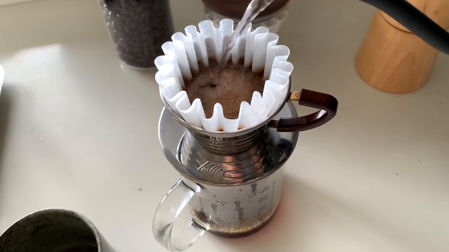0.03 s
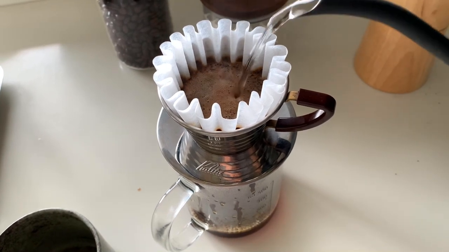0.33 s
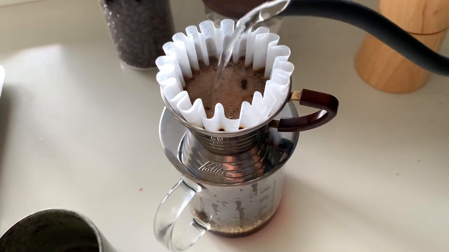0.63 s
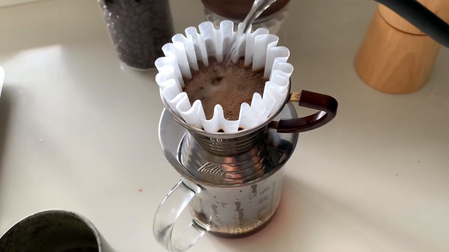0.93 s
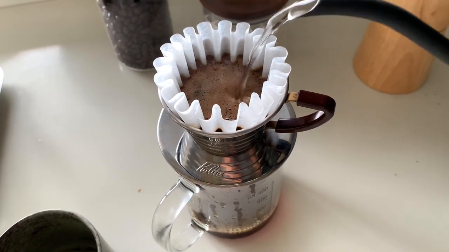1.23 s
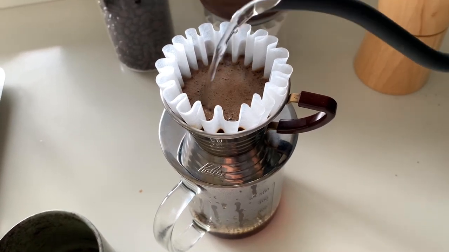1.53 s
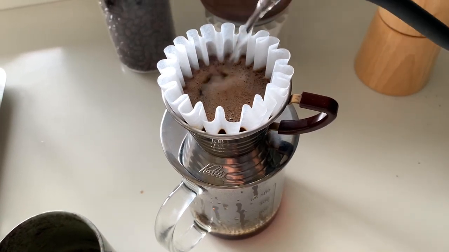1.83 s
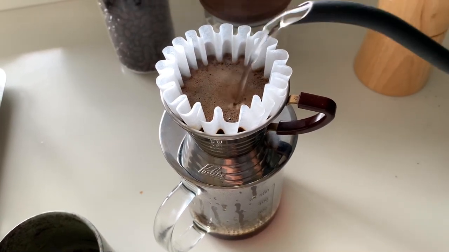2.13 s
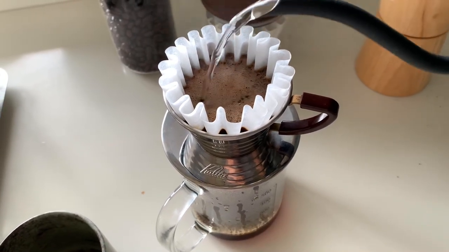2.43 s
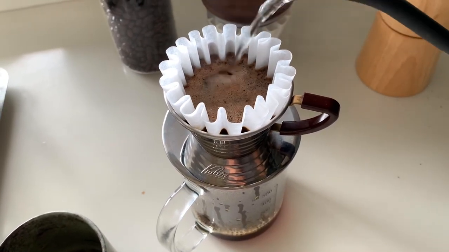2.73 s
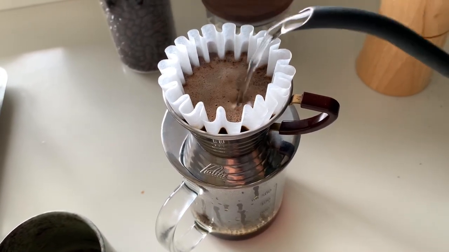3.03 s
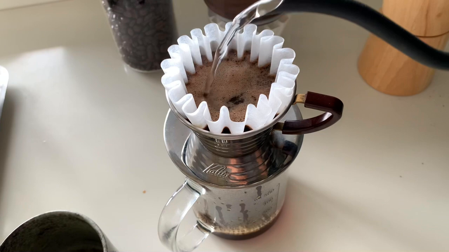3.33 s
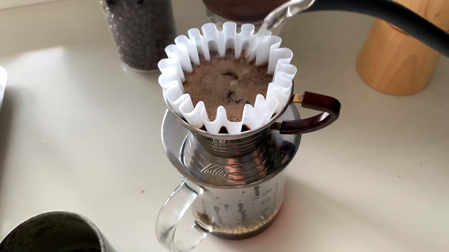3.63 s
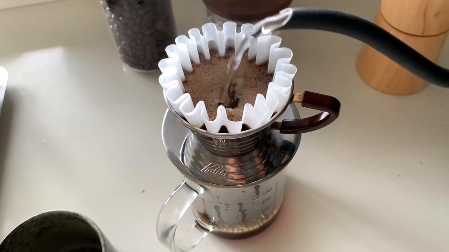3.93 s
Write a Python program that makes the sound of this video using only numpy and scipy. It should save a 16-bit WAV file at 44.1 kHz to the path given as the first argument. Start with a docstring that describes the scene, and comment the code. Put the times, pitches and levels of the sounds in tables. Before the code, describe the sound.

Close by in a quiet room, coffee drips and patters unevenly into a glass server while a kettle's thin stream wets the grounds. Foam fizzes faintly, and heavier plops and gurgling build toward the end.

```python
"""Coffee dripping into a glass server

A thin stream from a kettle wets coffee grounds, and the brew drips into a glass server. Each drip traps
a bubble whose short ping excites the air modes of the glass; heavy drops plop lower, with a thump.
Small drops slap and patter between them, foam fizzes and pops, and the quiet room rumbles faintly."""
import sys
import numpy as np
from scipy import signal
from scipy.fft import rfft, irfft
from scipy.io import wavfile

SR = 44100
rng = np.random.default_rng(int(sys.argv[2]) if len(sys.argv) > 2 else 0)


def transcribe(u):
    """Save the signal u as a 16-bit wav file named by the first command-line argument.

    u: samples, shape (n,) or (channels, n), limited to [-1, 1]; the rate is SR.
    q: integer samples, one column per channel.
    """
    v = np.clip(np.atleast_2d(u).T, -1, 1)
    q = np.round(v * 32767).astype(np.int16)
    wavfile.write(sys.argv[1], SR, q)


N = 176400

# Levels are relative; each source applies its own gain.
# spectrum of the room's rumble: frequency_hz, level_db
RUMBLE_SPECTRUM = [(15,-22),(30,-13),(39,-8),(50,0.6),(63,-4),(80,2),(97,-8),(120,-3),(131,-7),(142,0),(165,-9),(205,-13),(245,-7),(300,-9),(450,-25)]
# spectrum of the room's hiss: frequency_hz, level_db
HISS_SPECTRUM = [(150,-7),(350,2),(600,-4),(1200,-34),(2500,-14.5),(4000,-24.5),(6500,-22),(9000,-22),(11000,-19.5),(12000,-49),(12800,-16),(15500,-22.5)]
# strength of the trickle: time_s, patter_db, gurgle_db
FLOW_LEVELS = [(0,-53.5,-57),(.45,-52.5,-60),(.95,-54,-58),(1.4,-53.5,-63),(1.5,-51,-70),(1.8,-56,-55.5),(2.12,-50.5,-47),(2.35,-52,-62.5),(2.55,-46.5,-47.5),(2.68,-52.5,-57.5),(2.92,-51,-48.5),(3.04,-53,-50.5),(3.12,-48.5,-48),(3.34,-44,-49),(3.45,-54,-47),(3.63,-52.5,-48),(3.78,-53.5,-51.5),(4,-51,-48.5)]
# strength of the small bubbles: pitch_hz, level_db
PATTER_SPECTRUM = [(500,2),(800,-19),(1080,-5.5),(1350,-7),(1800,1.5),(2300,1.5),(2750,-10),(3100,-8),(3600,-1.5),(4500,-4.5),(6500,-17)]
# fine crackle of the foam: pitch_hz, level_db
FIZZ_PITCHES = [(4200,-1),(5500,-4),(7500,-1.5),(10000,25),(13000,-9),(14500,19)]
# foam bubbles bursting: start_s, level_db, pitch_hz
FOAM_POPS = [(0.156, -41.5, 13200), (0.403, -52, 8700), (0.788, -44, 13000), (1.1954, -43.5, 10400),
             (1.5408, -50.5, 14100), (1.882, -47, 13700), (2.489, -43, 13400), (2.569, -44, 13000),
             (3.099, -45.5, 13100), (3.224, -46, 13900), (3.307, -48, 10200), (3.365, -45.5, 10400),
             (3.485, -41, 12400), (3.5157, -42, 10700), (3.529, -46, 10300), (3.6883, -45.5, 13400),
             (3.903, -42, 13100)]
# drops slapping the brew: start_s, level_db
SPLAT_EVENTS = [(0.0528, -43.5), (0.3914, -39), (0.4054, -37), (0.4224, -46), (0.566, -57), (0.5717, -43),
                (1.324, -46.5), (1.484, -38.5), (1.681, -42), (1.7552, -43.5), (1.8495, -43),
                (1.8813, -40.5), (1.9425, -43.5), (2.1053, -50), (2.2664, -46.5), (2.2962, -43),
                (2.5727, -39.5), (2.6079, -46.5), (2.9024, -42.5), (3.0814, -38.5), (3.3445, -35.5),
                (3.372, -53), (3.4845, -46), (3.5289, -38.5), (3.689, -43.5), (3.8395, -57)]
# spectrum of one splat: frequency_hz, level_db
SPLAT_SPECTRUM = [(120,-24),(330,10.5),(650,-2.5),(1100,-4.5),(1400,-1.5),(2200,2),(3000,-4.5),(4000,-5),(5500,-16.5),(8000,-20.5),(15000,-28.5)]
# drips trapping a bubble: start_s, level_db, pitch_hz
DRIP_EVENTS = [(0.054, -34, 1930), (0.093, -36.5, 2010), (0.1214, -37.5, 1900), (0.1805, -27.5, 1850),
               (0.2183, -34, 2190), (0.2366, -31, 2020), (0.2503, -36.5, 1850), (0.2866, -42, 1800),
               (0.3914, -26.5, 1780), (0.5133, -41, 2020), (0.5642, -28.5, 1920), (0.6162, -35, 1980),
               (0.6834, -31, 1760), (0.696, -33.5, 1840), (0.7266, -33, 1820), (0.778, -28.5, 1820),
               (0.833, -31.5, 1990), (0.9135, -38.5, 1960), (0.9353, -39, 1800), (1.021, -39, 1790),
               (1.0569, -41, 1810), (1.0729, -31, 1980), (1.134, -30, 1800), (1.1773, -31.5, 1880),
               (1.2395, -31.5, 1870), (1.2848, -31, 1960), (1.3238, -30, 1900), (1.358, -32, 1820),
               (1.4567, -37.5, 2000), (1.5462, -31.5, 1740), (1.5586, -32.5, 1830), (1.5714, -32.5, 1870),
               (1.605, -33, 1870), (1.6612, -35.5, 1810), (1.681, -42, 1920), (1.7231, -34, 1755),
               (1.757, -30, 1790), (1.7653, -32, 2040), (1.888, -38.5, 1810), (1.9919, -35, 1820),
               (2.029, -35, 1880), (2.0779, -34.5, 1720), (2.126, -43, 2020), (2.1723, -34, 1765),
               (2.271, -40, 2060), (2.297, -33.5, 1680), (2.4908, -38.5, 2100), (2.5374, -34.5, 1570),
               (2.7408, -31.5, 1860), (2.7632, -28.5, 1940), (2.811, -37, 1760), (2.8759, -34, 1890),
               (3.08, -22, 1970), (3.1086, -38.5, 1720), (3.1964, -29.5, 1860), (3.2216, -37, 1900),
               (3.281, -47, 2170), (3.5168, -35.5, 2030), (3.6269, -30, 1690), (3.7461, -38, 1930),
               (3.8083, -38, 1880), (3.841, -41.5, 2200), (3.909, -34, 1940)]
# small bright bubbles: start_s, level_db, pitch_hz
PLINK_EVENTS = [(.157,-37,2660), (0.1845,-32.5,3940), (0.2167,-29,3060), (0.221,-32,3880), (.405,-45,3490),
                (0.57,-44,3024), (0.659,-43,2970), (1.138,-41,2370), (1.1956,-32.5,4650),
                (1.196,-35.5,5980), (1.326,-42,4150), (1.514,-50,2412), (1.74,-41,2412), (1.85,-44,3430),
                (1.984,-40.5,2320), (2.106,-38.5,2290), (2.133,-44,3080), (2.135,-48,4400),
                (2.175,-41,4240), (2.195,-52,4300), (2.268,-50,5100), (2.3,-41,2740), (2.43,-40.5,4230),
                (2.442,-51,3050), (2.747,-46.5,6800), (2.865,-49,3618), (3.142,-31.5,3640),
                (3.148,-35.5,3040), (3.27,-48,4500), (3.311,-40,3870), (3.34,-34,2390), (3.348,-37,2333),
                (3.505,-46,3570), (3.519,-41.5,7400), (3.628,-43.5,3210), (3.971,-40.5,4880)]
# heavy drops trapping a large bubble: start_s, level_db, pitch_hz
PLOP_EVENTS = [(0.4252, -43, 1160), (0.8869, -32.5, 1046), (1.4828, -40.5, 1180), (1.68, -40, 1090),
               (1.8479, -41, 1025), (1.884, -41.5, 1120), (2.079, -40, 1115), (2.1028, -38.5, 1210),
               (2.685, -43, 1070), (2.9201, -36.5, 1047), (3.148, -47, 1230), (3.206, -40, 1100),
               (3.271, -42, 1050), (3.343, -34.5, 1150), (3.4113, -33, 1035), (3.485, -37, 1050),
               (3.5288, -36, 1130), (3.579, -30, 1015), (3.628, -34.5, 1180), (3.665, -39.5, 1150),
               (3.8397, -37.5, 1155), (3.9711, -42, 1090)]
# air modes of the server: frequency_hz
AIR_MODE_HZ = [345,467,776,1055,1140,1482,1684,1840,1925,2080,2283,2412,2518,2930,3045,3280,3590,3886,5580,6050]
# the same modes, row for row: gain_db, t60_s, left_minus_right_db, left_lead_rad
AIR_MODES = [(6.6,0.2,0.5,0.5),(6.9,0.13,-6.5,2),(8.5,0.14,8.5,1),(5.2,0.038,2.5,1.68),(11,0.48,8,2.3),(3.03,0.15,-22,-1.5),(13.85,0.13,0.5,-5),(10.8,0.049,0.5,-2),(1.4,0.26,15.5,-3),(1.2,0.31,10,2.2),(7.8,0.059,12.5,-3),(7.8,0.037,9.5,-1.5),(15.1,0.11,11,2.5),(1.6,0.022,14.5,2),(14.3,0.11,-5.5,0.53),(4.1,0.18,8,4.5),(2.2,0.092,-20.5,-8.5),(5.8,0.12,-7.5,-1.2),(5.3,.05,3.5,2.5),(9.1,0.069,-10,7.5)]
# reverberation time of the room: frequency_hz, t60_s
ROOM_DECAY = [(200,0.18),(1000,0.27),(3000,0.082),(8000,0.18),(15000,0.025)]
# likeness of left and right: frequency_hz, coherence_ratio
COHERENCE = [(30,.96),(150,.93),(400,.75),(700,.4),(1100,.6),(1900,.6),(2600,.15),(5000,.2),(9000,.8),(14000,.75)]
# phase between the microphone ports: frequency_hz, left_lead_rad
PORT_PHASE = [(20,0),(140,-.4),(300,-.1),(2100,0),(2900,.5),(3500,2.4),(7000,3),(8800,0),(9700,0),(11400,-3.1),(12100,-3.2),(13200,-5.9),(14500,-6.3),(15900,-9.3)]

NEAR_DB, NEAR_T60_S, ROOM_DB = -3, 0.039, -6
RUMBLE_DB, HISS_DB = -48, -62
BUBBLE_Q, BUBBLE_ONSET_CYCLES, BUBBLE_RISE_PER_S = 22, 3, 2
PATTER_PER_S, BURBLE_PER_S, GURGLE_PER_S, FIZZ_PER_S, SPLATTER_PER_S = 330, 300, 300, 700, 60
BURBLE_DB, GURGLE_DB, SPREAD_DB = -1.5, -2.5, 5
FIZZ_DB, POP_DB, POP_BODY_DB, POP_BODY_HZ = -74, 15.5, -9.5, 7900
SPRAY_DB, PUFF_RISE_S, DROPLET_DB, DROPLET_DELAY_S = 9.5, .001, -11, (.006, .03)
SPLAT_DB, SPLATTER_DB = -0.5, -7.5
DRIP_DB, DRIP_CYCLES, DRIP_THUMP_DB, DRIP_SLAP_DB = -3, 2.4, -16.5, -14.5
THUMP_HZ, THUMP_CYCLES = 364.5, 0.77
ECHO_S, ECHO_DB = .0082, -11
PLOP_DB, PLOP_THUMP_DB, PLOP_SPLASH_DB = -2.5, -4, -1.5


def amp(db):
    """Amplitude ratio of a level in decibels."""
    return 10 ** (np.asarray(db) / 20)


def unit(x):
    """Normalisation to rms 1."""
    return x / np.sqrt(np.mean(x ** 2) + 1e-20)


def read(points, hz):
    """Interpolation on a logarithmic frequency axis."""
    f, value = np.transpose(points)
    return np.interp(np.log(hz + 1), np.log(f + 1), value)


def add(mix, start_s, sound):
    """Superposition: a sound adds to the mix from its start time."""
    part = mix[..., max(round(start_s * SR), 0):][..., :sound.shape[-1]]
    part += sound[..., :part.shape[-1]]


def convolve(x, response):
    """Convolution: a linear system answers each sample with its impulse response."""
    return signal.fftconvolve(np.atleast_2d(x), response, axes=1)[:, :N]


def coherent_spectra(noises):
    """Partial coherence: two independent noises mix into left and right spectra, most alike in the bass."""
    left, other = rfft(noises)
    coherence = read(COHERENCE, np.fft.rfftfreq(noises.shape[1], 1 / SR))
    return np.array([left, coherence * left + np.sqrt(1 - coherence ** 2) * other])


def room_noise(spectrum, order=0):
    """Stationary noise with a given spectrum; a positive order rolls it off above 290 Hz."""
    hz = np.fft.rfftfreq(N, 1 / SR)
    gain = amp(read(spectrum, hz)) / (1 + (hz / 290) ** order)
    return unit(irfft(coherent_spectra(rng.standard_normal((2, N))) * gain, N))


def reflections(size=12288):
    """Reverberation: early echoes from table and dripper, then the room's exponential tail."""
    t = np.arange(size) / SR
    near, far = rng.standard_normal((2, 2, size))
    near = near * amp(-60 * t / NEAR_T60_S) * (t > .002)
    hz, frame_s, spectra = signal.stft(far, SR, nperseg=256)
    decay = amp(-60 * frame_s / read(ROOM_DECAY, hz)[:, None])
    far = signal.istft(spectra * decay, SR, nperseg=256)[1][:, :size] * (t > .007)
    echoes = amp(NEAR_DB) * unit(near) + amp(ROOM_DB) * unit(far)
    return irfft(coherent_spectra(echoes), size) / np.sqrt(size)


def in_the_open(sound, wet_db):
    """Multipath propagation: the direct sound plus reflections that vary from place to place."""
    response = amp(wet_db) * reflections()
    response[:, 0] += 1
    return convolve(sound, response)


def server_response(size=9000):
    """Cavity resonance: a direct impulse plus the damped modes of the air in the glass."""
    t, out = np.arange(size) / SR, np.zeros((2, size))
    out[:, 0] = 1
    sides = np.array([[.5], [-.5]])
    for hz, (db, t60_s, pan_db, lead_rad) in zip(AIR_MODE_HZ, AIR_MODES):
        damping = np.log(1000) / t60_s
        ring = np.exp(-damping * t) * np.cos(2 * np.pi * hz * t + sides * lead_rad)
        out += amp(db + sides * pan_db) * 2 * damping / SR * ring
    return out


def in_glass(sound, glass, wet_db):
    """Filters in series: the echoes of a drop's landing place, then the resonance of the glass."""
    return convolve(in_the_open(sound, wet_db), glass)


def ping(hz, cycles, rise_per_s=0, size=1800):
    """Damped oscillation: a tone peaks after so many cycles and dies, with an optional upward glide."""
    t = np.arange(size) / SR
    age = t * hz / cycles
    return (age * np.exp(1 - age)) ** 2 * np.sin(2 * np.pi * hz * (t + rise_per_s * t * t / 2))


def bubble(hz, size=2400):
    """Bubble resonance: trapped air rings as a spring, its pitch rising as it nears the surface."""
    t = np.arange(size) / SR
    turns = hz * (t + BUBBLE_RISE_PER_S * t * t / 2)
    envelope = (1 - np.exp(-turns / BUBBLE_ONSET_CYCLES)) * np.exp(-np.pi * turns / BUBBLE_Q)
    return envelope * np.sin(2 * np.pi * turns)


def shower(pitches, per_s, voice):
    """Poisson process: bubbles of uneven strength sound as voice(hz) at each (pitch_hz, level_db)."""
    out = np.zeros((2, N))
    for hz, db in pitches:
        onsets = rng.random(N) < per_s / len(pitches) / SR
        excess_db = SPREAD_DB * np.minimum(rng.exponential(1, N), 3)
        out += convolve(onsets * amp(db + excess_db), voice(hz))
    return unit(out)


def trickle(glass):
    """Incoherent summation: many bubbles merge into patter, burble and gurgle that follow the flow."""
    def bubbles(pitches, per_s, voice):
        return shower(pitches, per_s, lambda hz: in_glass(voice(hz), glass, wet_db=-4))

    small = [(hz, read(PATTER_SPECTRUM, hz)) for hz in np.geomspace(650, 6000, 18)]
    ringing = [(hz, read(PATTER_SPECTRUM, hz)) for hz in np.geomspace(950, 5300, 30)]
    large = [(hz, 0) for hz in 377.2 * np.geomspace(.7, 1.45, 5)]
    patter = bubbles(small, PATTER_PER_S, lambda hz: ping(hz, cycles=1.8))
    burble = bubbles(ringing, BURBLE_PER_S, bubble)
    gurgle = bubbles(large, GURGLE_PER_S, lambda hz: ping(hz, cycles=1.06))
    time_s, patter_db, gurgle_db = np.transpose(FLOW_LEVELS)
    t = np.arange(N) / SR
    fine = unit(patter + amp(BURBLE_DB) * burble) * amp(np.interp(t, time_s, patter_db))
    return fine + gurgle * amp(GURGLE_DB + np.interp(t, time_s, gurgle_db))


def spray(hz, cycles, size=2400):
    """Film rupture: a wet surface tears in a puff of band-limited noise; two droplets land just after."""
    age = np.arange(size) / SR / PUFF_RISE_S
    puff = age * np.exp(1 - age)
    envelope = puff.copy()
    for delay_s in rng.uniform(*DROPLET_DELAY_S, size=2):
        add(envelope, delay_s, amp(DROPLET_DB) * puff)
    sound = signal.fftconvolve(envelope * rng.standard_normal(size), ping(hz, cycles))[:size]
    return sound / np.linalg.norm(sound)


def foam():
    """Bursting bubbles on the grounds radiate outside the glass, as a steady fizz and distinct pops."""
    fizz = shower(FIZZ_PITCHES, FIZZ_PER_S, lambda hz: in_the_open(ping(hz, cycles=2), wet_db=3))
    out = amp(FIZZ_DB) * fizz
    for start_s, db, hz in FOAM_POPS:
        pop = spray(hz, cycles=2.2) + amp(POP_BODY_DB) * spray(POP_BODY_HZ, cycles=0.72)
        add(out, start_s, amp(db + POP_DB) * in_the_open(pop, wet_db=-4))
    return out


def click(spectrum, size=1024):
    """Minimum phase packs the energy of a spectrum into a sharp click of peak 1."""
    log_gain = np.log(amp(read(spectrum, abs(np.fft.fftfreq(size, 1 / SR)))))
    out = np.fft.ifft(np.exp(np.conj(signal.hilbert(log_gain)))).real
    return out / abs(out).max()


def splats(glass, places=6):
    """Brief impacts radiate a broad band: distinct slaps, and random splatter that follows the flow."""
    out, splatter = np.zeros((2, 2, N))
    slap = click(SPLAT_SPECTRUM)
    for start_s, db in SPLAT_EVENTS:
        add(out, start_s, amp(db + SPLAT_DB) * in_glass(slap, glass, wet_db=9))
    for _ in range(places):
        chance, strength = rng.random((2, N))
        impacts = (chance < SPLATTER_PER_S / places / SR) * strength
        splatter += convolve(impacts, in_glass(slap, glass, wet_db=9))
    time_s, patter_db, _ = np.transpose(FLOW_LEVELS)
    return out + unit(splatter) * amp(SPLATTER_DB + np.interp(np.arange(N) / SR, time_s, patter_db))


def echoed(sound):
    """Specular reflection: a nearby surface returns one delayed, weaker copy."""
    out = np.pad(sound, (0, len(sound)))
    add(out, ECHO_S, amp(ECHO_DB) * sound)
    return out


def drips(glass):
    """Air entrainment: a drip slaps and thumps the surface, and the bubble it traps rings."""
    out = np.zeros((2, N))
    thump = amp(DRIP_THUMP_DB) * ping(THUMP_HZ, THUMP_CYCLES)
    slap = amp(DRIP_SLAP_DB) * ping(hz=2990, cycles=1)
    stretches = 1 + .3 * rng.uniform(-0.94, 1, len(DRIP_EVENTS))  # no two ring equally long
    for (start_s, db, hz), stretch in zip(DRIP_EVENTS, stretches):
        ring = ping(hz, DRIP_CYCLES * stretch, rise_per_s=1.1) / np.sqrt(stretch)
        drip = echoed(ring + thump + slap)
        add(out, start_s, amp(db + DRIP_DB) * in_glass(drip, glass, wet_db=-6))
    return out


def plinks(glass):
    """Small bubbles resonate high; each throws up spray pitched just above its own note."""
    out = np.zeros((2, N))
    for start_s, db, hz in PLINK_EVENTS:
        plink = bubble(hz) + amp(SPRAY_DB) * spray(hz * 1.05, cycles=1)
        add(out, start_s, amp(db) * in_glass(plink, glass, wet_db=-2))
    return out


def plops(glass):
    """Resonant frequency falls with bubble size: heavy drops ring low, with a thump and a splash."""
    out = np.zeros((2, N))
    thump = amp(PLOP_THUMP_DB) * ping(THUMP_HZ, THUMP_CYCLES)
    splash = amp(PLOP_SPLASH_DB) * ping(hz=1890, cycles=0.87)
    for start_s, db, hz in PLOP_EVENTS:
        plop = ping(hz, cycles=1.9) + thump + splash
        add(out, start_s, amp(db + PLOP_DB) * in_glass(plop, glass, wet_db=-3))
    return out


def scene():
    """Superposition of the drops in the glass, the foam on the grounds and the room."""
    glass = server_response()
    water = drips(glass) + plops(glass) + plinks(glass) + splats(glass) + trickle(glass)
    brew = water * amp([[-.4], [.4]]) + foam()  # the water lies slightly to the right
    rumble = amp(RUMBLE_DB) * room_noise(RUMBLE_SPECTRUM, order=6)
    hiss = amp(HISS_DB) * room_noise(HISS_SPECTRUM)
    return brew + rumble + hiss


def record(dry):
    """Phase difference between two microphone ports, then a low-pass band limit."""
    lead_rad = read(PORT_PHASE, np.fft.rfftfreq(N, 1 / SR))
    heard = irfft(rfft(dry) * np.exp(1j * np.array([[.5], [-.5]]) * lead_rad), N)
    lowpass = signal.firwin(511, cutoff=15850, window=("kaiser", 9), fs=SR)
    return signal.oaconvolve(heard, lowpass[None], "same")


dry = scene()
out = record(dry)
transcribe(out)
```